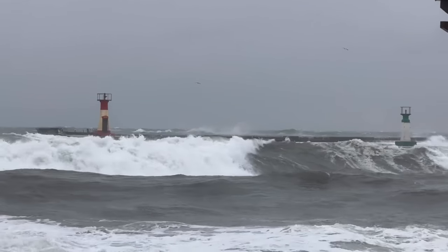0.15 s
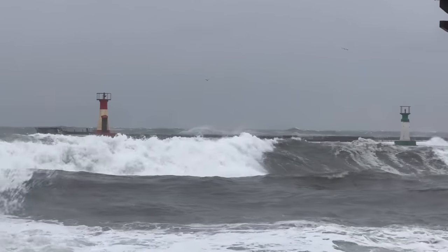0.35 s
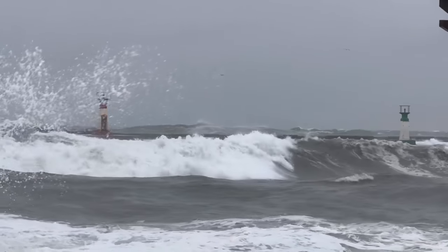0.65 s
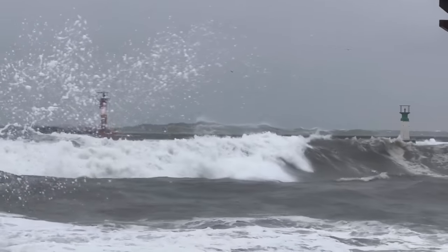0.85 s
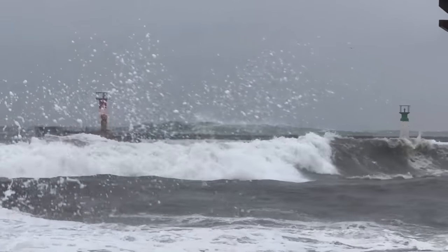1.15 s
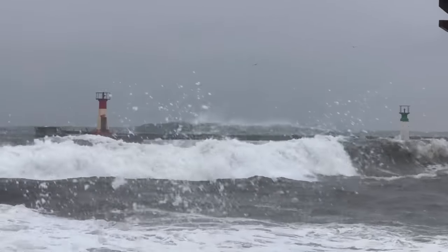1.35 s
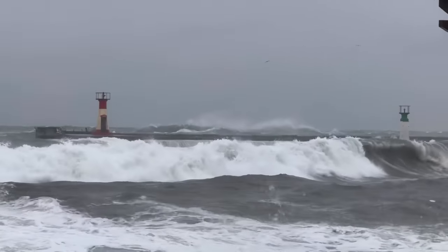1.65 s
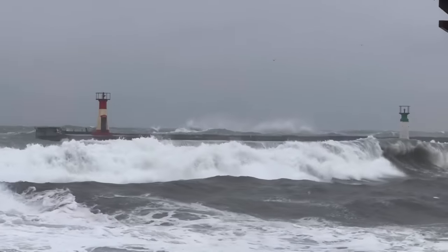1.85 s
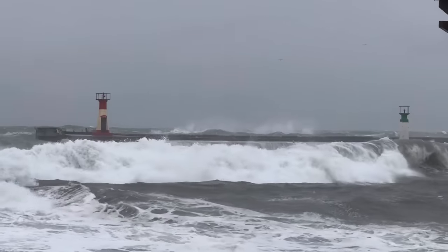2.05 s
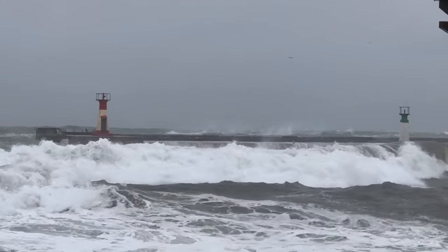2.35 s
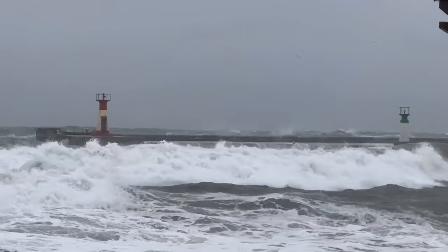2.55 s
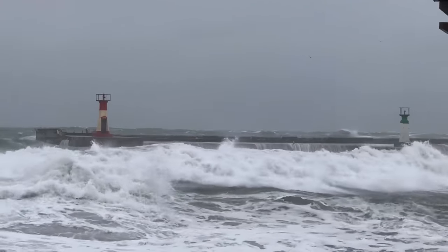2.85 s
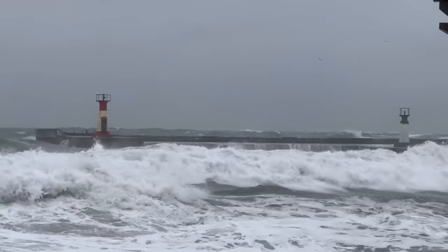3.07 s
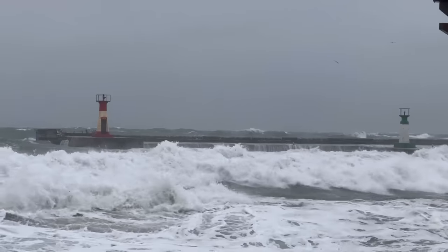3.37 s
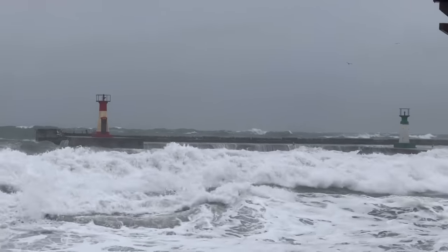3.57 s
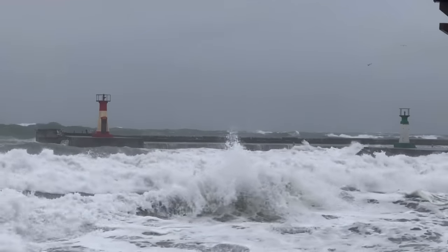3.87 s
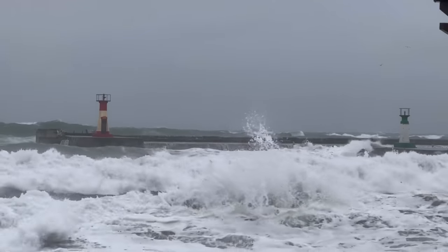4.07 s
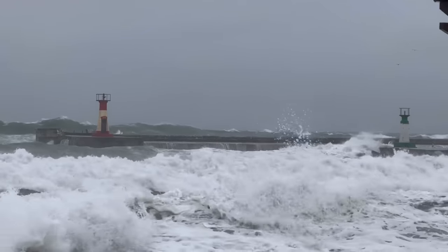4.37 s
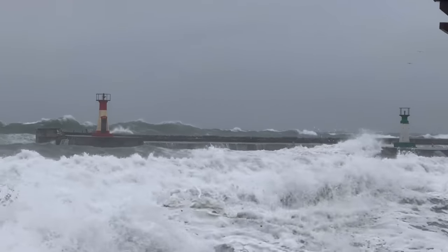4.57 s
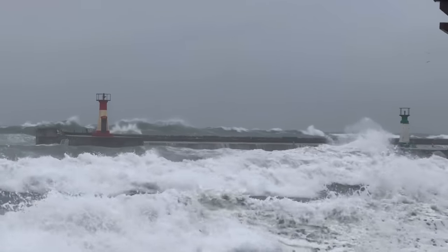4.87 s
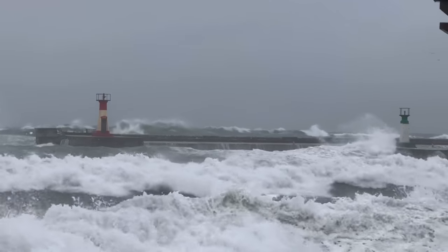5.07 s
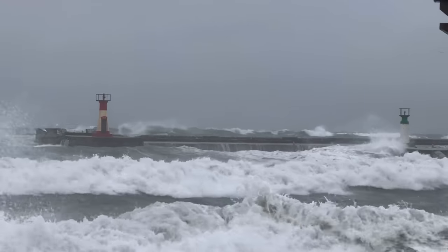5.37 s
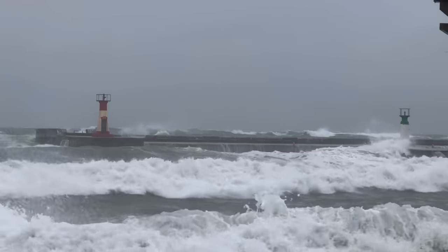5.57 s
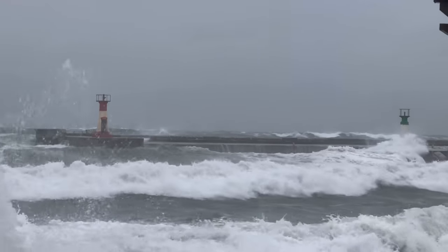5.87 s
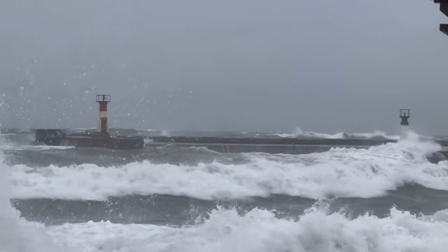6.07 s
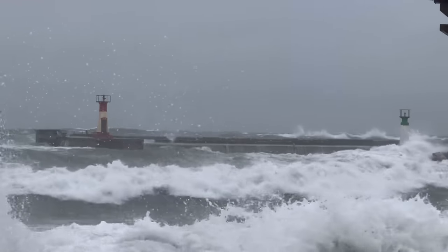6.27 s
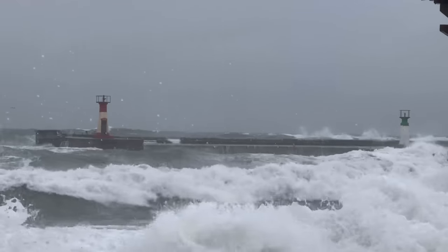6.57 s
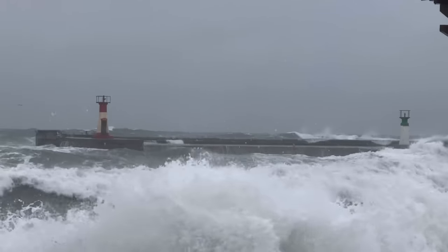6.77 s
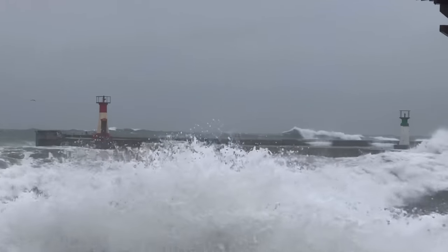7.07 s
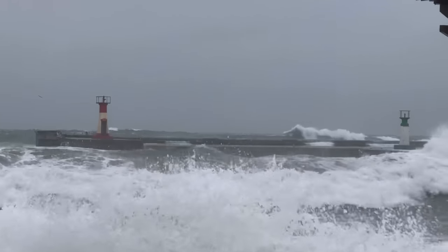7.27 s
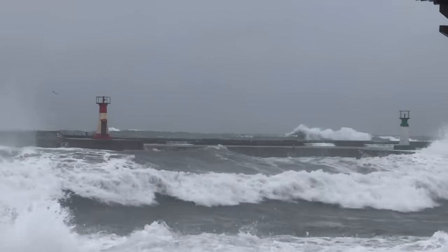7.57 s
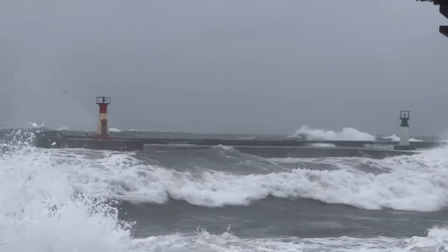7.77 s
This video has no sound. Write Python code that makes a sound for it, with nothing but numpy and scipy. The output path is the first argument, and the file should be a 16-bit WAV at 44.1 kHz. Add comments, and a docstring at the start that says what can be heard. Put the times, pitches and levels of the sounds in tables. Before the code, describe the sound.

Outdoors by a rough sea, a small microphone takes gusts directly. Low, uneven wind rumble and dull buffets dominate, with quick thumps of falling pitch, over a constant muffled roar of breaking waves coloured by the microphone housing. A closer breaker brightens briefly around three and a half seconds; the strongest wind blows come near five. After a short lull and a small hollow note, rumble and surf continue to the end.

```python
"""Lumpy low wind rumble and scattered short thumps sound over the broad roar of storm surf at a harbour
wall. Turbulent eddies at the two ports of a small stereo microphone are shaped noise, single swings and
dying tones of falling pitch. The sea is band-shaped noise for roar, crash hiss and spray, coloured by
the resonances of the housing; near breakers bloom brighter, and one brief hollow tone rings late."""
import sys
import numpy as np
from scipy import signal
from scipy.fft import rfft, irfft, next_fast_len
from scipy.io import wavfile
from scipy.ndimage import uniform_filter1d, minimum_filter1d

SR = 44100
rng = np.random.default_rng(int(sys.argv[2]) if len(sys.argv) > 2 else 0)


def transcribe(u):
    """Save the signal u as a 16-bit wav file named by the first command-line argument.

    u: samples, shape (n,) or (channels, n), limited to [-1, 1]; the rate is SR.
    q: integer samples, one column per channel.
    """
    v = np.clip(np.atleast_2d(u).T, -1, 1)
    q = np.round(v * 32767).astype(np.int16)
    wavfile.write(sys.argv[1], SR, q)


N = 349272
TIME_S = np.arange(N) / SR
SIZE = next_fast_len(N)
HZ = np.maximum(np.arange(SIZE // 2 + 1) * SR / SIZE, 1)   # frequencies of the spectral lines
SLOW_STEP = 40   # slow curves are computed at every 40th sample


def from_db(db):
    """Decibel law: twenty decibels are a factor of ten in amplitude."""
    return 10 ** (np.asarray(db) / 20)


def rms_one(x):
    """Normalisation: scales the mean power to one."""
    return x / np.sqrt(np.mean(x ** 2) + 1e-20)


def in_time(rows):
    """Linear interpolation in time: each column of a curve table, one value per sample."""
    s, *columns = np.transpose(rows)
    return [np.interp(TIME_S, s, column) for column in columns]


def on_grid(points):
    """Interpolation over log frequency: each column of a table, one value per spectral line."""
    hz, *columns = np.transpose(points)
    return [np.interp(np.log(HZ), np.log(hz), column) for column in columns]


def drift(rate_hz):
    """Low-pass random process: noise through a double one-pole filter, scaled to spread 1."""
    pole = np.exp(-2 * np.pi * rate_hz * SLOW_STEP / SR)
    noise = rng.standard_normal(N // SLOW_STEP + 2002)
    slow = signal.lfilter([1], [1, -2 * pole, pole * pole], noise)[2000:]   # drops the settling time
    return np.interp(np.arange(N) / SLOW_STEP, np.arange(len(slow)), rms_one(slow))


def swells(s, half_s, peak_db):
    """Incoherent addition: the powers of Gaussian swells in time are summed."""
    t = np.arange(0, N, SLOW_STEP) / SR
    bells = np.exp(-2 * ((t - s[:, None]) / half_s[:, None]) ** 2)
    power = from_db(peak_db) ** 2 @ bells
    return np.interp(TIME_S, t, power)


def panned(x, pan_db):
    """Interchannel level difference: pan_db is left minus right, shared equally."""
    return x * from_db(np.array([[pan_db / 2], [-pan_db / 2]]))


def evened(x, share, span_s):
    """Regular eddy shedding: short-term power is levelled, so swings are more alike than in plain noise."""
    span = max(round(span_s * SR), 2)
    power = uniform_filter1d(np.mean(x ** 2, axis=0), span)
    return rms_one(x / (power + 0.012) ** (share / 2))


# The two ports: (frequency [Hz], likeness [0-1], left minus right [dB], phase lead of the left [rad])
PORTS = [(25, 0.88, -0.5, -0.07), (60, 1, -0.5, -0.22), (109, 0.99, 2.5, -0.026), (200, 0.94, 0.5, 0.15),
         (610, 0.71, 1.5, 0.27), (884, 1, 2.5, -0.2), (930, 0.6, -9, -0.098), (1030, 1, 0, 0.35),
         (1260, 0.88, -2.5, 0.77), (1570, 0.48, -1, -0.52), (2250, 0.8, 1, -0.22), (3400, 0.99, -1.5, 0.93),
         (4540, 0.9, 0, 0.4), (5030, 1, -0.5, 0)]


def at_ports(spectrum, patchy_db, patch_rate_hz, together=1, count=4):
    """Partial coherence: shared plus own noise at each port, in bands that swell separately; rms 1."""
    alike, balance_db, lead = on_grid(PORTS)
    alike = together * np.clip(alike, 0, 1)
    shared, left, right = rfft(rng.standard_normal((3, SIZE)))
    own = np.array([left, right])
    tilt = from_db(balance_db / 2) * np.exp(.5j * lead)
    pair = np.array([tilt, 1 / tilt]) * (np.sqrt(alike) * shared + np.sqrt(1 - alike) * own)
    pair *= from_db(on_grid(spectrum)[0])
    lowest_hz, highest_hz = spectrum[0][0], spectrum[-1][0]
    place = 2 * np.log2(np.clip(HZ, lowest_hz, highest_hz) / lowest_hz)   # in half octaves
    out = np.zeros((2, N))
    for k in range(count):   # bands `count` half octaves apart share a swell
        distance = np.abs((place - k + count / 2) % count - count / 2)
        window = np.clip(1 - distance, 0, 1)   # overlapping windows add up to one
        band = irfft(pair * window, SIZE)[:, :N]
        out += band * from_db(patchy_db * drift(patch_rate_hz))
    return rms_one(out)


# Resonances of the housing cavity: (centre frequency [Hz], bandwidth [Hz], gain [dB])
CAVITY = [(844, 99, 8), (957.6, 63.6, -15), (1127, 67, 3.5)]


def housing(x):
    """Cavity resonance: two peaks and a notch in front of the capsules."""
    for hz, width_hz, gain_db in CAVITY:
        w, g = 2 * np.pi * hz / SR, from_db(gain_db / 2)
        a = np.pi * width_hz / SR
        numerator = [1 + a * g, -2 * np.cos(w), 1 - a * g]
        denominator = [1 + a / g, -2 * np.cos(w), 1 - a / g]
        x = signal.lfilter(numerator, denominator, x)
    return x


# Wind force at the ports, before lulls and buffets act on it:
# (time [s], rumble between buffets [dB], flutter of small fast eddies [dB])
GALE = [(0.0, -31, -30), (0.05, -37, -32.5), (0.17, -46.5, -31), (0.35, -38, -38.5), (0.6, -36, -41.5),
        (0.7, -30.5, -35.5), (0.86, -26.5, -26), (1.08, -29.5, -30.5), (1.19, -28.5, -29.5),
        (1.61, -28, -30), (1.72, -23.5, -31.5), (2.14, -36.5, -27), (2.34, -25.5, -28), (3.04, -26, -29.5),
        (3.2, -27, -29.5), (3.93, -22.5, -26.5), (4.19, -21.5, -24), (4.39, -28.5, -25.5), (4.74, -23, -25),
        (4.96, -22.5, -22), (5.23, -25, -25.5), (5.53, -23.5, -23), (5.65, -24.5, -27), (5.82, -32, -30),
        (5.93, -38, -36), (6.15, -27.5, -34.5), (6.42, -30, -27.5), (6.84, -23.5, -31),
        (7.01, -23.5, -28.5), (7.39, -27.5, -29.5), (7.61, -26.5, -28), (7.81, -26.5, -36.5),
        (7.92, -22.5, -27)]
# Spectra of large, small and single-port eddies: (frequency [Hz], relative level per Hz [dB])
RUMBLE = [(8, -46), (20, -23), (33, -13), (48, 4), (62, 12), (78, 9), (95, 9), (125, -5), (200, -18),
          (600, -110)]
FLUTTER = [(20, -65), (60, -3.5), (120, 6), (170, 1), (250, -8.5), (400, -33.5), (800, -38.5), (2500, -120)]
EDDY = [(10, -40), (30, -11), (60, 3.5), (110, -1.5), (200, -7), (350, -21), (800, -52.5), (2500, -120)]
# Gain of the deepest rumble: (time [s], level [dB])
DEEP = [(0, -5), (.5, -6), (1.0, -4.5), (2.0, -1), (2.8, 2.5), (3.6, 2.5), (4.6, 4.5), (5.2, 5), (5.6, 1.5),
        (6.0, -5), (6.4, 0.5), (7.92, 4)]
DEEP_HZ = 63   # the gain acts below this
# Swirls independent at each port: (time of the height [s], level [dB], half length [s])
SWIRLS = [(.2, -30, 0.45), (0.865, -31, 0.23), (2.604, -36, 0.16), (3.79, -21.5, 0.1), (5.748, -25, 0.16)]
# Large eddies rolling over both ports:
# (time of the height [s], peak of the bell [dB], pitch [Hz], half length [s])
BUFFETS = [(0.014, -14, 110, 0.009), (0.06, -22.5, 110, 0.01), (0.107, -23, 121, 0.0055),
           (0.2, -21, 135, 0.0037), (0.254, -22, 95, 0.0088), (0.315, -18, 114, 0.006),
           (0.365, -22, 120, 0.0065), (0.438, -19, 125, 0.0052), (0.804, -18, 96, 0.011),
           (0.828, -18, 120, 0.0089), (0.912, -13, 101, 0.0084), (0.954, -16.5, 85, 0.009),
           (0.984, -12, 80, 0.011), (1.007, -13.5, 100, 0.0068), (1.039, -19, 80, 0.008),
           (1.226, -15.5, 97, 0.007), (1.269, -18, 98, 0.0063), (1.608, -9, 88, 0.0074),
           (1.664, -12.5, 88, 0.012), (1.936, -13.5, 87, 0.0029), (2.045, -12.5, 83, 0.0072),
           (2.122, -14.5, 88, 0.0087), (2.198, -16.5, 92, 0.024), (2.292, -13, 92, 0.0079),
           (2.475, -17.5, 89, 0.0088), (2.571, -14, 90.5, 0.0061), (2.66, -17, 75, 0.0083),
           (2.696, -16, 70, 0.015), (2.718, -13, 80, 0.0086), (2.744, -12.5, 92, 0.01),
           (2.759, -13, 125, 0.0041), (3.009, -12.5, 86, 0.011), (3.165, -12.5, 82, 0.0096),
           (3.488, -14.5, 81, 0.0091), (3.515, -8.5, 82, 0.0074), (3.639, -9.5, 87, 0.011),
           (3.767, -11, 79, 0.0078), (3.859, -8, 86, 0.0033), (3.978, -17, 100, 0.0081),
           (4.044, -12.5, 80, 0.0085), (4.128, -17, 93, 0.0058), (4.197, -9, 82, 0.0088),
           (4.273, -4.5, 72, 0.0023), (4.456, -12.5, 92, 0.005), (4.54, -9, 102, 0.0031),
           (4.579, -15, 102, 0.012), (4.774, -7, 80, 0.01), (4.819, -10, 77, 0.013),
           (5.055, -6.5, 94, 0.0067), (5.153, -7.5, 110, 0.0082), (5.313, -9, 70, 0.0071),
           (5.38, -12, 60, 0.0071), (5.404, -7.5, 65, 0.0096), (5.42, -10, 70, 0.0054),
           (5.446, -6, 120, 0.005), (5.499, -14, 110, 0.012), (5.53, -13, 65, 0.0088),
           (5.546, -9, 65, 0.0054), (5.564, -10, 60, 0.012), (5.608, -14, 65, 0.0077),
           (5.665, -12, 60, 0.0077), (6.099, -20, 106, 0.0071), (6.17, -22, 96, 0.01),
           (6.365, -14.0, 90, 0.012), (6.54, -15, 91, 0.006), (6.6, -18.5, 101.6, 0.014),
           (6.846, -20, 99, 0.029), (6.929, -13, 100, 0.005), (6.971, -15, 100, 0.028),
           (7.114, -10.5, 87, 0.011), (7.151, -13, 95, 0.0052), (7.265, -12, 109, 0.006),
           (7.407, -13.5, 117, 0.0086), (7.519, -19, 91, 0.0062), (7.612, -16, 84, 0.0064),
           (7.67, -16, 103, 0.0056), (7.824, -20, 96, 0.0088)]
LULL_DB, LULL_RATE_HZ = 1.35, 12      # spread and rate of chance lumps and lulls
GIVE_WAY_DB = 6.5                     # each buffet lowers rumble and flutter this far at its height
LOCAL_DB, LOCAL_FOLLOWS = -34.5, 2    # own eddies: level at mean flutter [dB], dB per dB of flutter swing


def gale():
    """Turbulence: large eddies rumble, small ones flutter, and some act on each port independently."""
    rumble_db, flutter_db = in_time(GALE)
    rumble_level = from_db(rumble_db + LULL_DB * drift(LULL_RATE_HZ))
    flutter_level = from_db(flutter_db + LULL_DB * drift(LULL_RATE_HZ))
    s, _, _, half_s = np.transpose(BUFFETS)
    aside = from_db(-GIVE_WAY_DB * swells(s, half_s, np.zeros(len(s))))
    s, swirl_db, half_s = np.transpose(SWIRLS)
    local_level = from_db(LOCAL_DB + LOCAL_FOLLOWS * (flutter_db - flutter_db.mean()))
    lone_level = np.sqrt(local_level ** 2 + swells(s, half_s, swirl_db))
    rumble = evened(at_ports(RUMBLE, patchy_db=-1.5, patch_rate_hz=6.8), share=0.93, span_s=0.068)
    flutter = evened(at_ports(FLUTTER, patchy_db=1.5, patch_rate_hz=43.0), share=0.98, span_s=0.045)
    deep = signal.sosfilt(signal.butter(2, DEEP_HZ, fs=SR, output="sos"), rumble)
    rumble = rumble + (from_db(in_time(DEEP)[0]) - 1) * deep
    lone = lone_level * at_ports(EDDY, patchy_db=5.0, patch_rate_hz=29.0, together=0)
    return aside * (rumble_level * rumble + flutter_level * flutter) + lone


def buffets():
    """Pressure pulse: a large eddy pushes both membranes together under a Gaussian swell."""
    reach = 6615   # samples on each side of the height
    out, t = np.zeros(N + 2 * reach), np.arange(-reach, reach) / SR
    turns = rng.random(len(BUFFETS))
    for (s, peak_db, hz, half_s), turn in zip(BUFFETS, turns):
        at = round(s * SR)
        bell = from_db(peak_db) * np.exp(-(t / half_s) ** 2)
        out[at:at + len(t)] += bell * np.cos(2 * np.pi * (hz * t + turn))
    return out[reach:N + reach]


# Gusts striking the ports, levels before the housing colours them:
# (time [s], peak level [dB], starting pitch [Hz], time to fall 60 dB [s])
THUMPS = [(0.094, -19.5, 280, 0.055), (0.1481, -11.5, 617, 0.037), (0.186, -14.5, 256, 0.066),
          (0.298, -18, 258, 0.043), (0.357, -14, 260, 0.032), (0.451, -17, 238, 0.046),
          (0.708, -19.5, 215, 0.094), (2.732, -16, 298, 0.04), (2.753, -13.5, 385, 0.044),
          (3.413, -13.5, 327, 0.025), (3.569, -15, 333, 0.061), (3.962, -16.5, 257, 0.067),
          (4.249, -14, 333, 0.053), (4.256, -12.5, 456, 0.073), (4.73, -10, 677, 0.055),
          (4.748, -10, 664, 0.016), (5.13, -4.5, 410, 0.029), (5.1365, -1, 887, 0.023),
          (5.347, -11.5, 400, 0.019), (5.43, -5, 514, 0.055), (5.443, -10.5, 255, 0.13),
          (5.529, -8, 372, 0.078), (5.591, -14.5, 427, 0.058), (5.672, -28, 293, 0.043),
          (5.809, -16, 375, 0.034)]


def thumps():
    """Damped oscillation: a gust front shakes both membranes, and the swings slow as they die."""
    length, final_hz = 6615, 90
    out, t = np.zeros(N + length), np.arange(length) / SR
    chance = rng.standard_normal((len(THUMPS), 2))
    for (s, peak_db, start_hz, t60), (phase, pace) in zip(THUMPS, chance):
        fall_s = 0.158 * t60 * from_db(0.5 * pace)
        hz = final_hz + (start_hz - final_hz) * np.exp(-t / fall_s)
        rise = 1 - np.exp(-(t * start_hz / 1.13) ** 2)   # takes about one swing
        shape = rise * from_db(-60 * t / t60)
        swings = shape * np.sin(2 * np.pi * np.cumsum(hz) / SR + 3 * phase)
        at = round(s * SR)
        out[at:at + length] += from_db(peak_db) * swings / np.abs(swings).max()
    return out[:N]


# Spectrum of the ragged wake behind a thump: (frequency [Hz], relative level per Hz [dB])
WAKE = [(40, -39), (110, -6.5), (250, -0.5), (450, 1.5), (700, -12), (1500, -66.5)]
# start relative to the thump's peak, before the low-pass [dB]; time to fall 60 dB [s]; low-pass [Hz]
WAKE_DB, WAKE_T60_S, WAKE_TOP_HZ = -20.5, .16, 730


def wakes():
    """Decaying turbulence: lumpy small-eddy noise starts with each thump and dies exponentially."""
    s, peak_db, _, _ = np.transpose(THUMPS)
    starts = np.zeros(N)
    starts[(s * SR).astype(int)] = from_db(peak_db + WAKE_DB)
    decay = from_db(-60 / (WAKE_T60_S * SR))   # per sample
    level = signal.lfilter([1], [1, -decay], starts + 1e-18)
    ragged = level * at_ports(WAKE, patchy_db=4.0, patch_rate_hz=28.0)
    return signal.sosfilt(signal.butter(6, WAKE_TOP_HZ, fs=SR, output="sos"), ragged)


# Breakers: (time [s], crash hiss [dB], fine spray [dB]), levels before the housing
SEA = [(0, -36.5, -73), (.5, -36.5, -76.5), (.9, -34, -73.5), (1.3, -35.5, -74), (1.6, -36, -72.5),
       (1.8, -36, -72), (2.25, -35.5, -71.5), (2.55, -37.5, -71.5), (2.9, -36.5, -75.5), (3.44, -37.5, -73),
       (3.52, -32.5, -70), (3.56, -35, -68), (3.6, -33.5, -69.5), (3.66, -31, -69), (3.77, -35, -69.5),
       (3.95, -35, -68), (4.15, -35, -70.5), (4.4, -35, -71.5), (4.65, -34.5, -67.5), (4.9, -33, -68.5),
       (5.15, -33.5, -67), (5.45, -34.5, -68), (5.75, -35, -71), (6.1, -35, -71.5), (6.55, -34, -72),
       (6.82, -34, -67), (7.02, -34.5, -69.5), (7.3, -33.5, -67.5), (7.65, -32.5, -67.5), (7.9, -35, -68.5)]
# Spectra of the three layers: (frequency [Hz], relative level per Hz [dB])
ROAR = [(15, -60), (60, -4), (200, -1), (400, -0.5), (700, -1), (1100, -6.5), (1500, -28.5), (2500, -46.5),
        (6000, -120)]
HISS = [(300, -40), (700, 3), (1300, -2.5), (1900, -11.5), (2600, -20.5), (3600, -33), (4600, -50),
        (7000, -91.5)]
SPRAY = [(2000, -27.5), (3600, -4), (4600, -6), (6300, -12.5), (7500, -23.5), (8800, -37), (10000, -58.5),
         (15000, -80)]
# roar before the housing: start and height [dB], time of the height [s], left minus right [dB]
ROAR_START_DB, ROAR_TOP_DB, ROAR_TOP_S, ROAR_PAN_DB = -29, -27, 4.9, 1.34


def sea():
    """Random superposition: countless collapsing bubbles blur into roar, brighter hiss and fine spray."""
    hiss_db, spray_db = in_time(SEA)
    roar_db, = in_time([(0, ROAR_START_DB), (ROAR_TOP_S, ROAR_TOP_DB)])
    roar = from_db(roar_db) * at_ports(ROAR, patchy_db=0.92, patch_rate_hz=14.0)
    hiss = from_db(hiss_db) * at_ports(HISS, patchy_db=1.02, patch_rate_hz=22.0)
    spray = from_db(spray_db) * at_ports(SPRAY, patchy_db=1.0, patch_rate_hz=7.5)
    return housing(panned(roar, ROAR_PAN_DB) + hiss + spray)


# Near breakers: (time of the height [s], level [dB], half length [s])
BLOOMS = [(1.75, -64, .15), (2.3, -62.5, 0.19), (3.61, -52, .04), (3.742, -54, 0.14), (4.0, -60, 0.072),
          (5.1, -63, .3), (6.849, -60, 0.11), (7.597, -60, 0.29)]
# Their spectrum: (frequency [Hz], relative level per Hz [dB])
BLOOM = [(1000, -30.5), (2200, 4.5), (3200, -6), (4500, -18), (6500, -35), (9000, -69.5)]


def blooms():
    """Amplitude envelope: a breaker close by swells into bright noise and recedes."""
    s, bloom_db, half_s = np.transpose(BLOOMS)
    level = np.sqrt(swells(s, half_s, bloom_db))
    return level * at_ports(BLOOM, patchy_db=2.0, patch_rate_hz=15.0)


# One hollow tone: (time [s], level before onset shaping [dB], frequency [Hz], time to fall 60 dB [s],
# left minus right [dB])
HOLLOW = (6.352, -19, 482, .2, -1.0)


def hollow_tone():
    """Single resonant mode: a sine swells in and decays, the right port lagging in phase."""
    s, level_db, hz, t60, pan_db = HOLLOW
    t = np.maximum(TIME_S - s, 0)
    shape = from_db(level_db - 60 * t / t60) * (1 - np.exp(-t / 0.0048))
    phase = np.array([[.8], [-.8]])   # left, right [rad]
    return panned(shape * np.sin(2 * np.pi * hz * t + phase), pan_db)


def scene():
    """Linear superposition: wind and sea add; the sea, thumps and wakes pass the housing."""
    return sea() + blooms() + gale() + buffets() + housing(thumps() + wakes()) + hollow_tone()


LOW_CUT_HZ, CUTOFF_HZ = 33, 15100
CEILING = .85                                # limiter threshold, full scale = 1
SELF_NOISE_DB, SELF_NOISE_HZ = -90, 13300    # electronic noise before its high-pass; its lower edge
CLOCK_HZ, MIRROR_DB = 9600, -61.5            # inner clock that the bass modulates; modulation gain
MIRROR_LOW_HZ, MIRROR_HIGH_HZ = 80, 260      # bass band that leaks


def record(dry):
    """Band-limiting, peak limiting and amplitude modulation: bass mirrors around a clock, over hiss."""
    x = dry * np.minimum(TIME_S / .003, 1)   # opens over 3 ms
    x = signal.sosfilt(signal.butter(2, LOW_CUT_HZ, "high", fs=SR, output="sos"), x)
    needed = minimum_filter1d(CEILING / np.maximum(np.abs(x).max(axis=0), CEILING), size=160)
    gain = uniform_filter1d(uniform_filter1d(needed, size=80), size=80)   # eases in and out over a few ms
    x = x * gain
    bass_band = signal.butter(2, [MIRROR_LOW_HZ, MIRROR_HIGH_HZ], "band", fs=SR, output="sos")
    bass = signal.sosfilt(bass_band, x)
    noise_band = signal.butter(8, SELF_NOISE_HZ, "high", fs=SR, output="sos")
    x = x + from_db(SELF_NOISE_DB) * signal.sosfilt(noise_band, rng.standard_normal(N))
    x = x + from_db(MIRROR_DB) * bass * np.cos(2 * np.pi * CLOCK_HZ * TIME_S)
    return signal.sosfilt(signal.ellip(10, .5, 60, CUTOFF_HZ, fs=SR, output="sos"), x)


dry = scene()
out = record(dry)
transcribe(out)
```